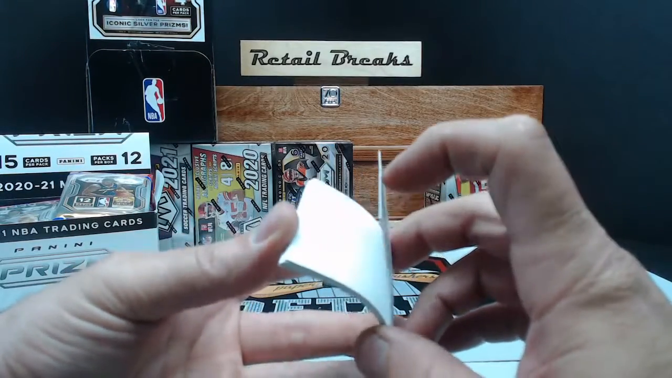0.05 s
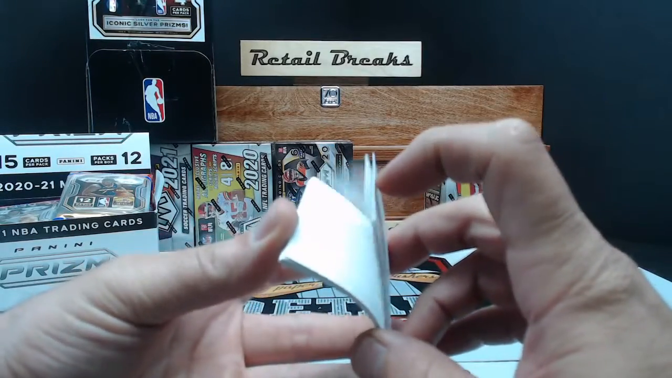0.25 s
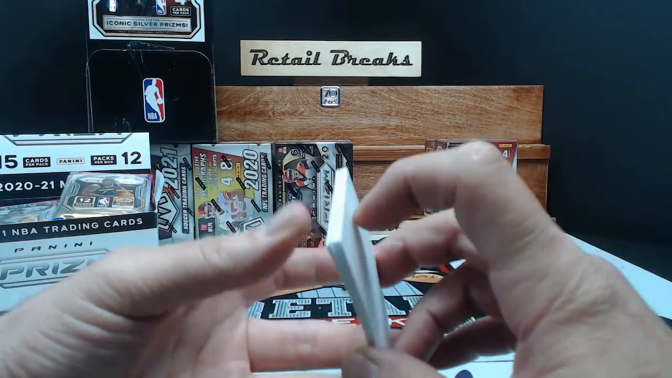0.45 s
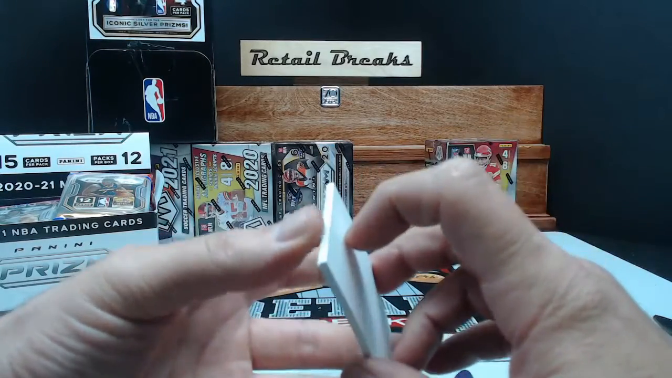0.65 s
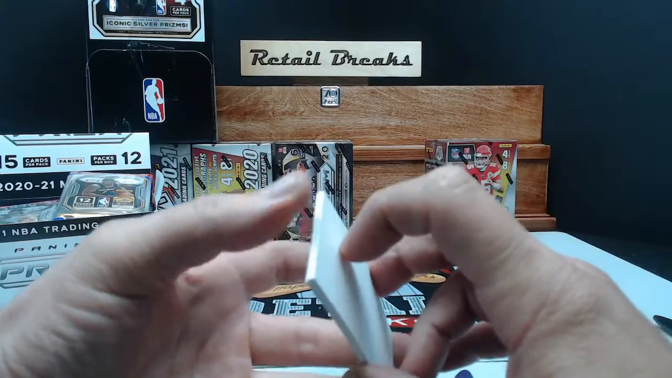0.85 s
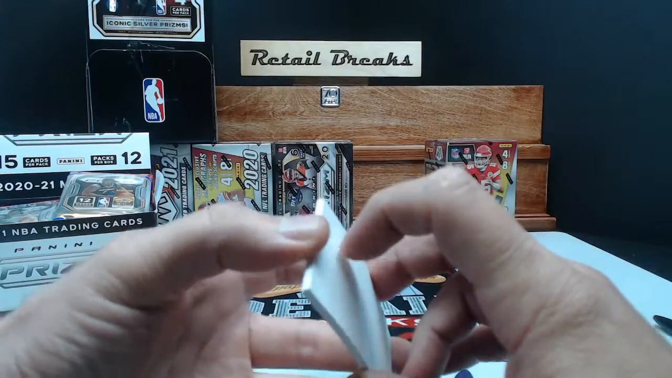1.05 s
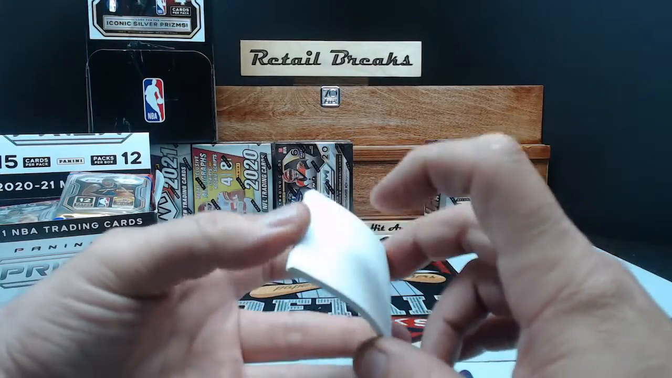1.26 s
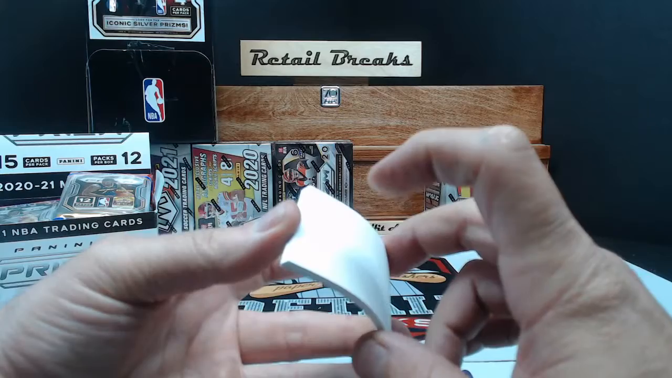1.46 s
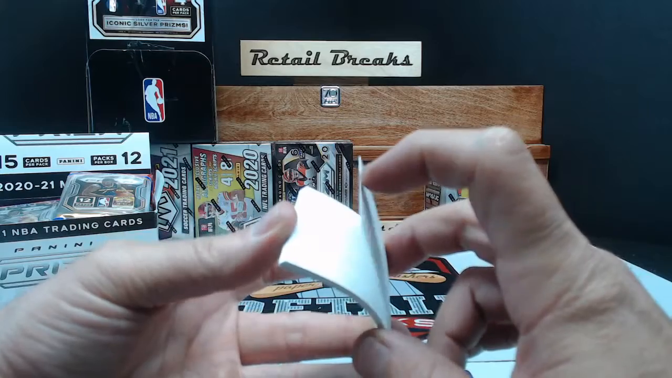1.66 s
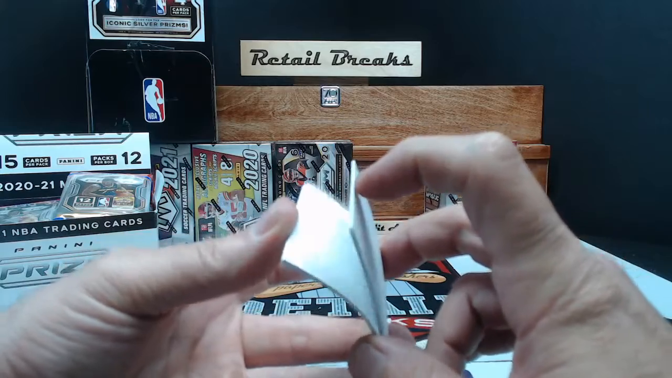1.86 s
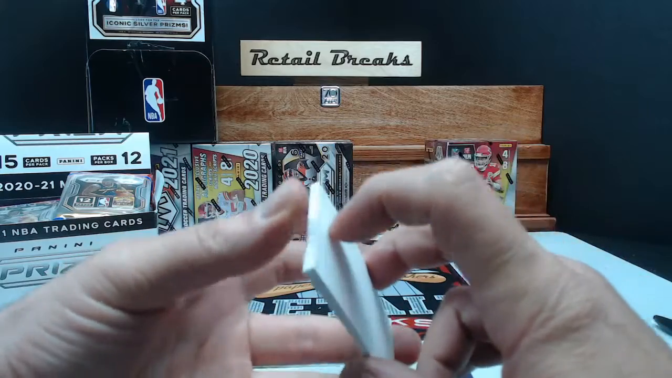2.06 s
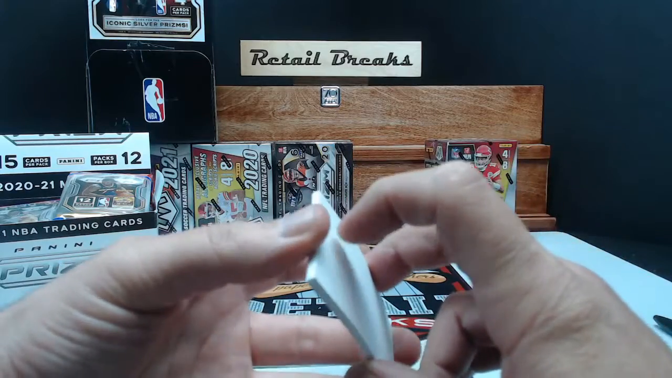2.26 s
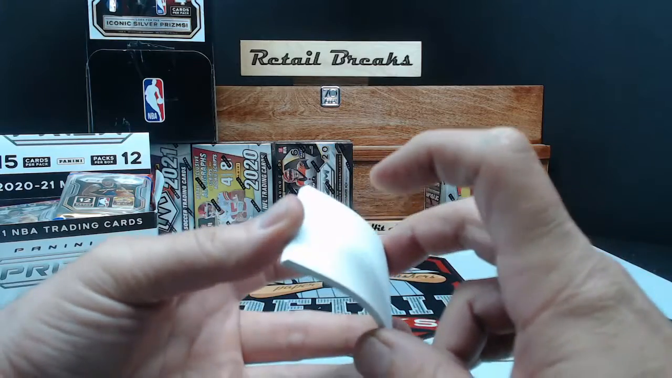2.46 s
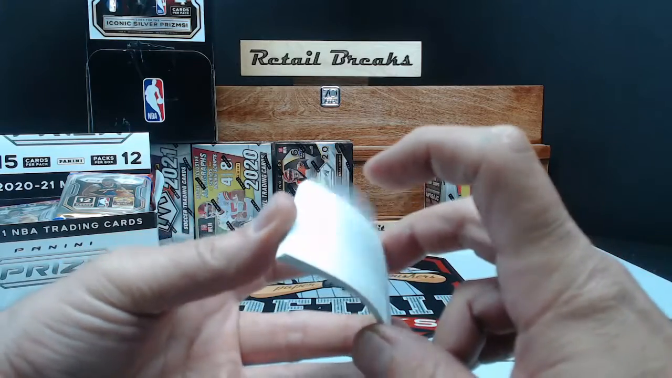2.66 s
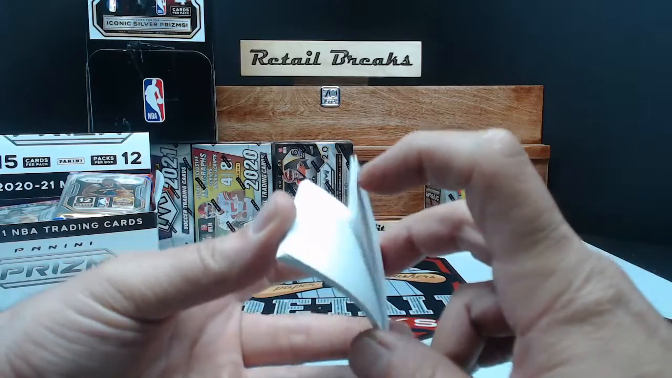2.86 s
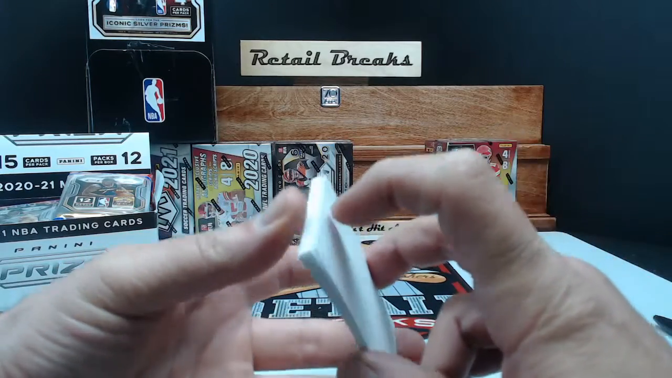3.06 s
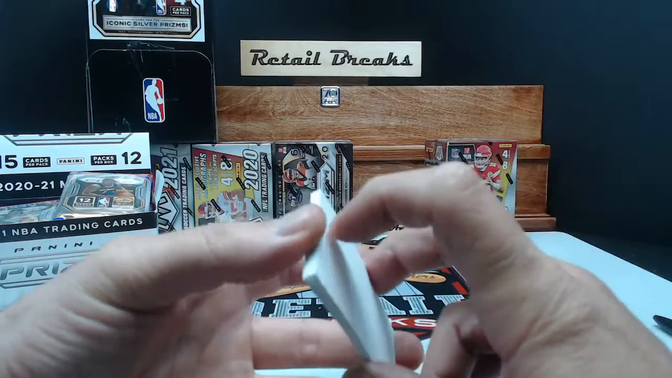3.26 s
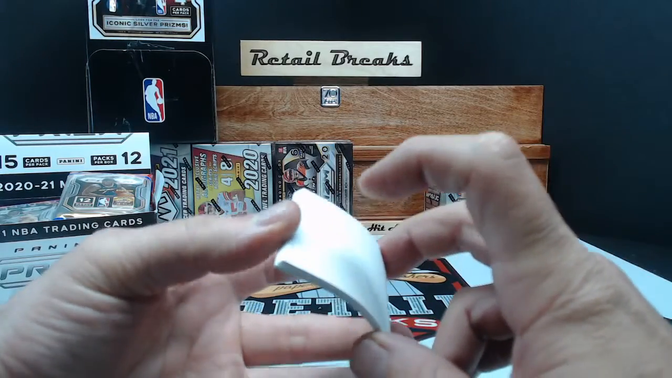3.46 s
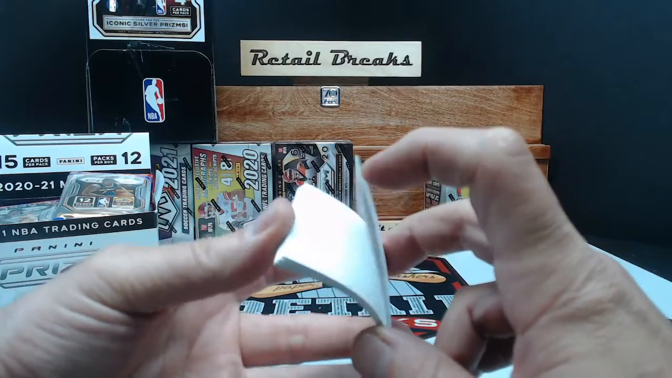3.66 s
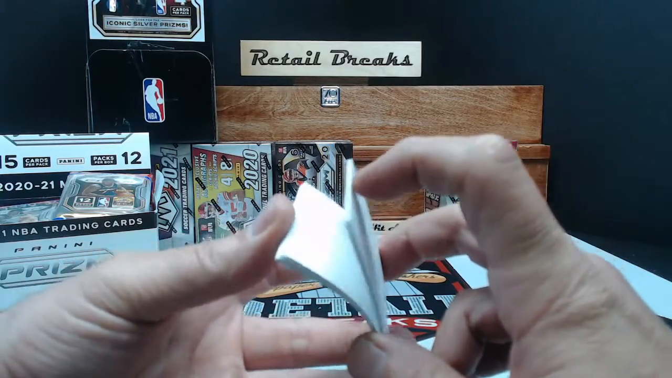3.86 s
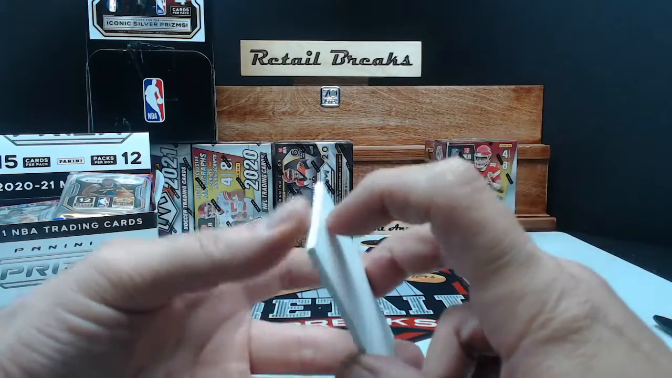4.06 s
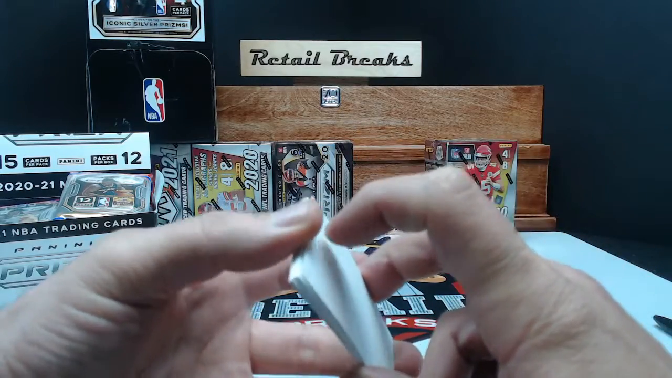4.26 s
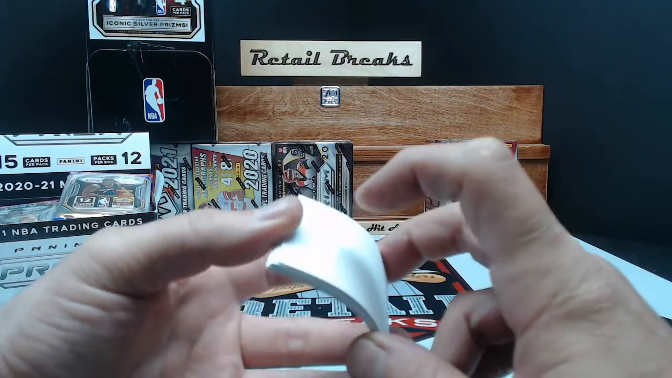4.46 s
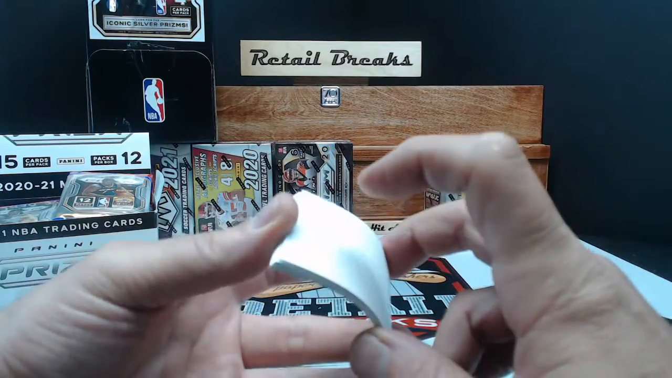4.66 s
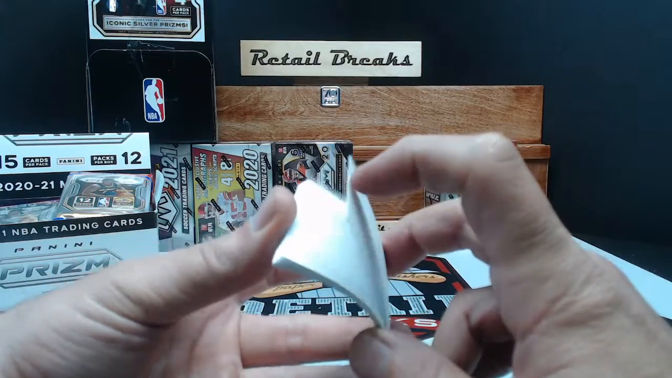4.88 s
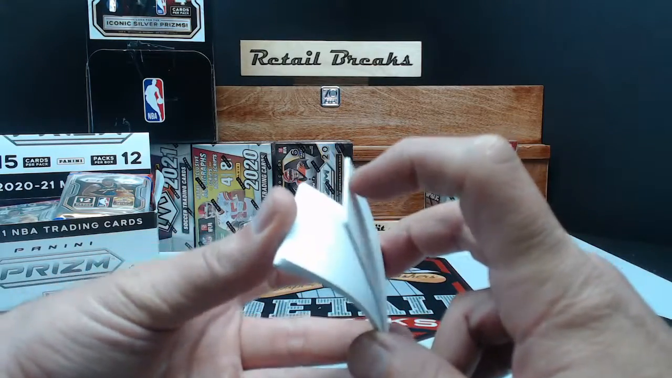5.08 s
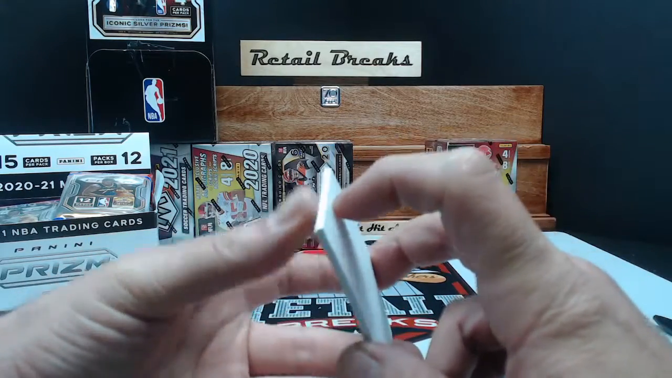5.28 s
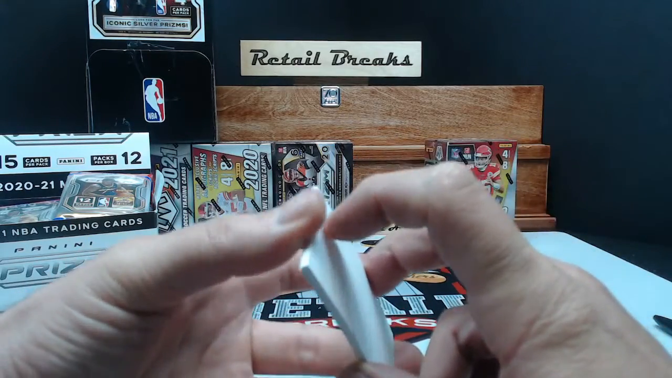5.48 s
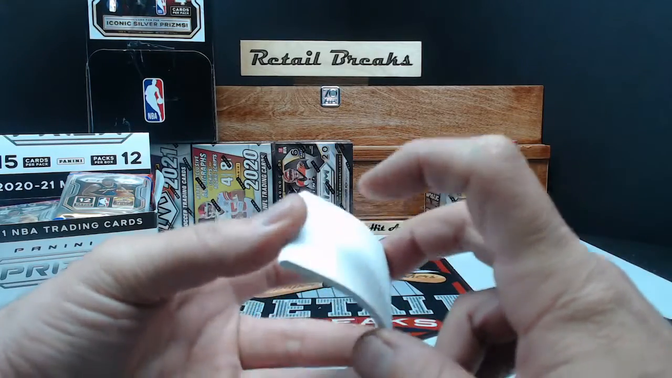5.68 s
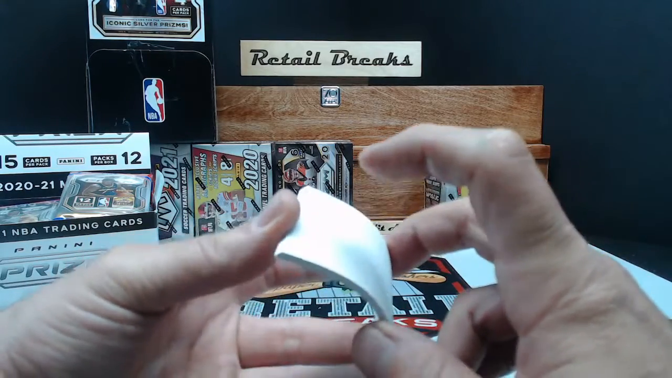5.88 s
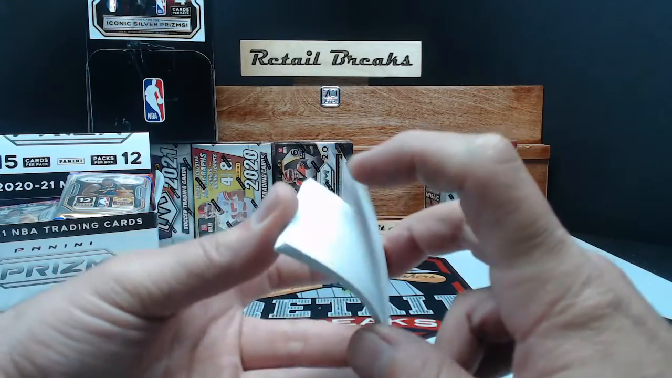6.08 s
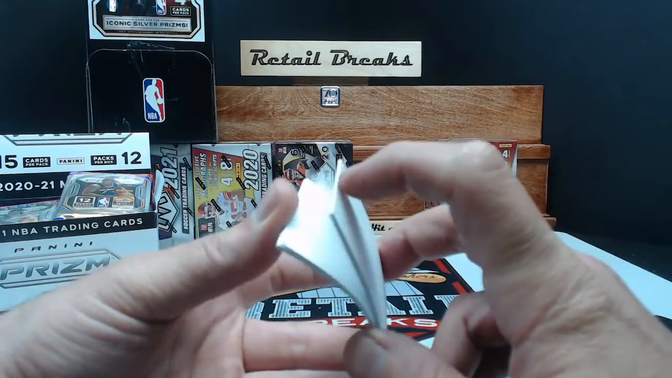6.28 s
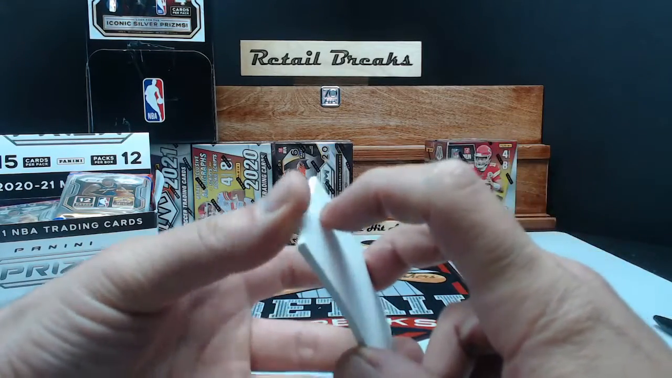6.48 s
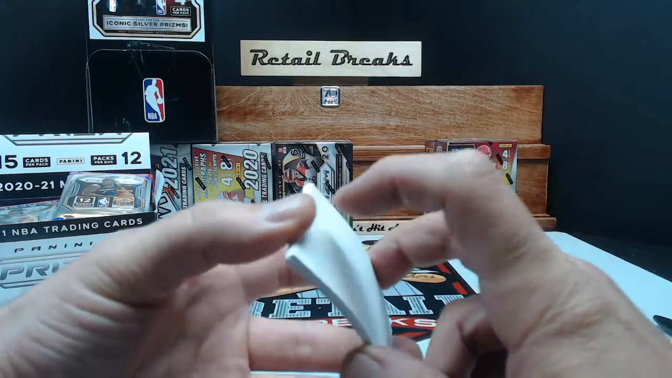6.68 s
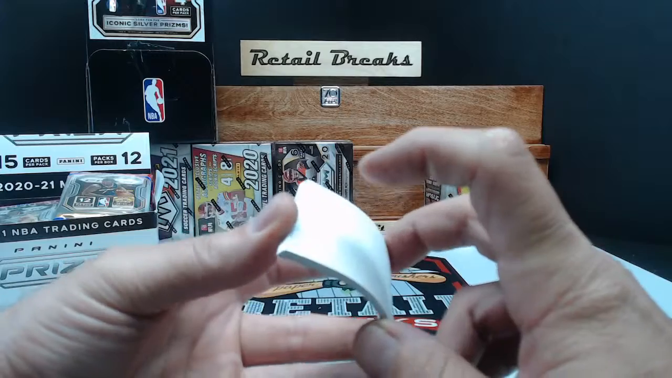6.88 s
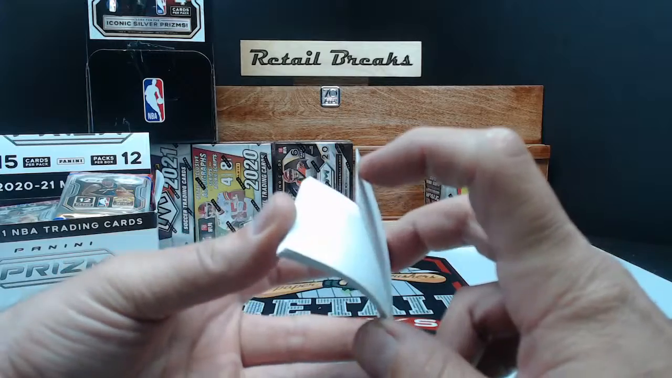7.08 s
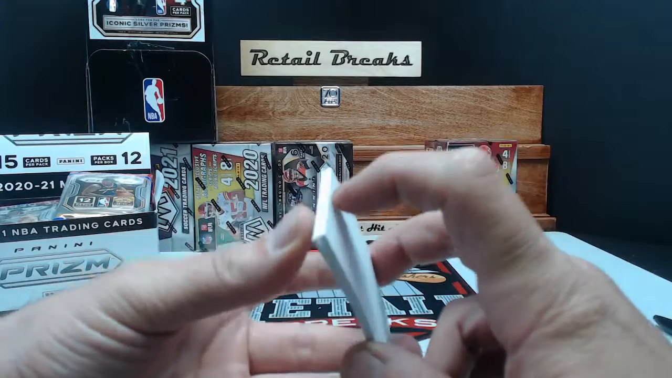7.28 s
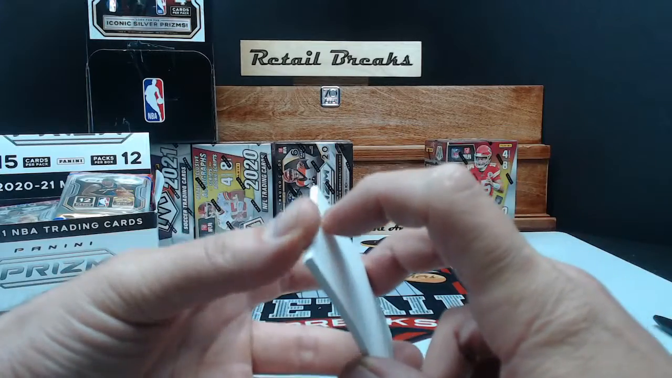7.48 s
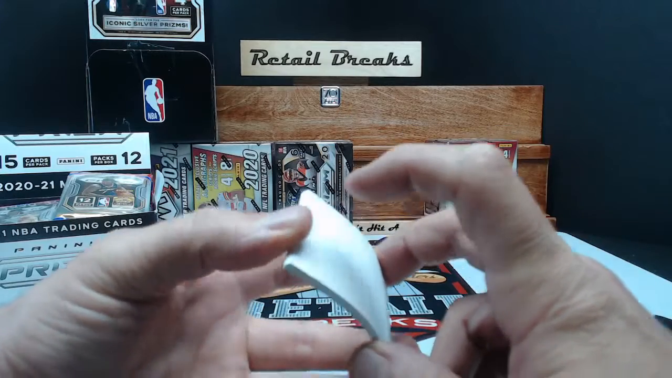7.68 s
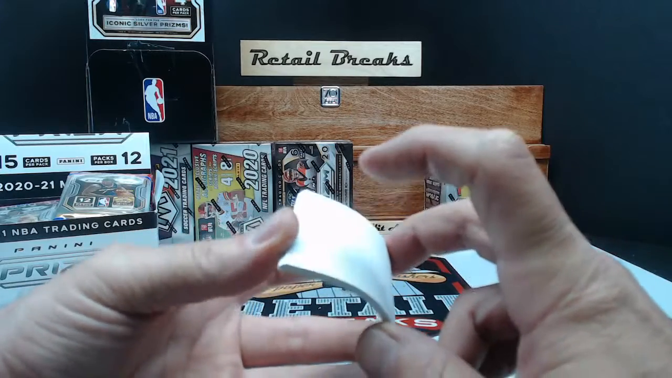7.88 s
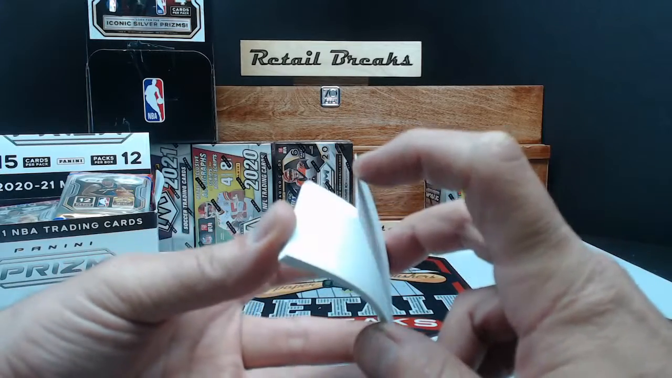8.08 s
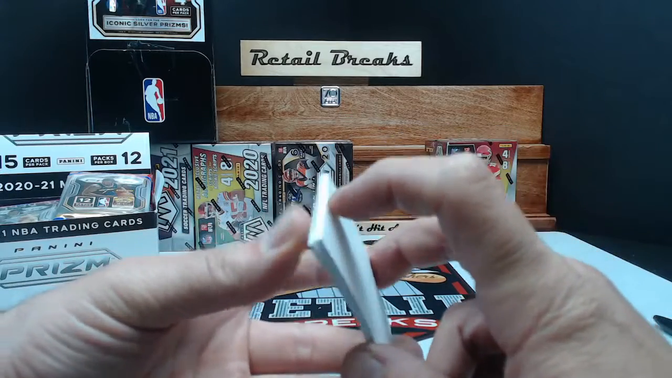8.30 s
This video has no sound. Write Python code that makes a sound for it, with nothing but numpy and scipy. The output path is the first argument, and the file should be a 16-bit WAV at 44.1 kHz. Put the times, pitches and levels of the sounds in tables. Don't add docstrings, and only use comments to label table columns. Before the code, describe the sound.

A small stack of stiff cards is riffled by thumb close to the microphone in a small room. A loud, bright snap starts at 0 s, followed by a light, uneven patter of slaps from 0.15 s and a strong last slap near 0.32 s. Further snaps come at about 1.6, 2.7, 3.6, 4.9, 6.1, 6.95 and 7.95 s. Each is a crisp crack with a short hollow knock from the palm and tiny bounces, then a run of thin, papery ticks lasting until roughly 0.3 s after the snap. The one near 4.9 s is loud and bright, the one at 6.1 s softer, the one at 6.95 s a hard blow. Between riffles there are dull palm taps, faint rubbing and irregular deep desk rumble around 43 Hz. The room floor is very quiet, dull and patchy, briefly opening around each riffle; the last flutter ends near 8.3 s.

```python
import sys
import numpy as np
from scipy import signal
from scipy.fft import rfft, irfft, next_fast_len
from scipy.io import wavfile
from scipy.ndimage import uniform_filter1d

SR = 44100
rng = np.random.default_rng(int(sys.argv[2]) if len(sys.argv) > 2 else 0)


def voltage_ratio(level):
    return 10 ** (np.asarray(level, float) / 20)


def generate_wav(sig):
    pcm = np.round(np.clip(np.atleast_2d(sig).T, -1, 1) * 32767).astype(np.int16)
    wavfile.write(sys.argv[1], SR, pcm)


N = 367794
TIME = np.arange(N) / SR
SLOW_STEP = 40

# (frequency [Hz], density [dB per Hz])
LOW_ROOM = [(41, -36), (70, -4.5), (103, -13), (145, -7.5), (297, -19.5), (420, -15), (560, -34.5),
            (730, -51.5), (1230, -120)]
# (frequency [Hz], density [dB per Hz])
MID_ROOM = [(330, -42.5), (560, 0), (1020, -3), (1330, -1.5), (1480, -7.5), (2340, -12), (2880, -27.5),
            (3180, -37.5), (4030, -26), (5070, -35.5), (6000, -34), (7800, -77), (13200, -120)]
WHINE_HZ, WHINE_DB, HISS_DB = 2830, -15.5, -95.5
OPEN_RISE_DB_PER_S, CLOSE_DB_PER_S, OPEN_S, START_DB = 150.0, 43, 0.067, 8.0
LOW_SHUT_DB, LOW_OPEN_DB, LOW_UNDER_SHAKE_DB = -72, -63.5, -29
MID_SHUT_DB, MID_OPEN_DB = -74.5, -61

# (start [s], length [s], shake [dB])
LEANS = [(0.035, 0.39, -40), (.5, 0.11, -54), (0.74, 0.089, -44.5), (0.999, 0.035, -44.5),
         (1.266, 0.081, -51), (1.668, 0.12, -41), (2.02, 0.24, -41.5), (2.36, 0.21, -41), (2.67, 0.14, -40),
         (3.086, 0.12, -46), (3.37, 0.2, -42.5), (3.73, 0.14, -46), (4.022, 0.36, -49),
         (4.383, 0.059, -46.5), (4.573, 0.052, -50.5), (4.892, 0.23, -45.5), (5.172, 0.15, -38),
         (5.45, .25, -43), (6.056, 0.042, -37), (6.16, 0.09, -54), (6.339, 0.051, -41.5),
         (6.549, 0.14, -43.5), (7.014, 0.058, -44), (7.275, 0.28, -40.5), (7.911, .28, -42)]
# (start [s], length [s], level [dB])
SWAYS = [(.72, 0.17, -43.5), (1.617, .08, -51), (1.988, 0.26, -41.5), (2.363, 0.11, -43.5),
         (2.646, 0.085, -49), (3.38, 0.14, -49.5), (4.019, 0.31, -49), (4.577, 0.063, -54),
         (4.882, .1, -48), (5.352, 0.33, -45.5), (5.97, .1, -58.5), (6.553, 0.092, -50.5),
         (7.903, 0.044, -52.5)]
LEAN_RISE_DB_PER_S, LEAN_FALL_DB_PER_S = 260.0, 302.5
STILL_DB, SWAY_UNDER_SHAKE_DB = -73.5, -8.5

# (time [s], level [dB], pitch [Hz], length [s])
RUSTLES = [(2.35, -84, 5100, 0.012), (2.55, -78.5, 4740, .025), (4.1, -76.5, 1580, 0.025),
           (4.13, -63, 634, 0.022), (0.75, -68, 1287, 0.14), (3.33, -70, 1510, 0.075),
           (5.95, -58.5, 380, 0.044), (7.72, -61, 392, 0.063), (4.78, -73, 695, 0.0176),
           (3.9, -54.5, 139, 0.034), (4.3, -60.5, 333, 0.069), (3.3, -59.5, 450, 0.046),
           (2.19, -67.5, 748, .08), (6.85, -66, 713, .05), (1.05, -60, 120, 0.057)]
RUB_DB, RUB_FADE_DB_PER_S, SLIP_DB = -79.5, 129, -36
TICKS_PER_S, TICK_DB, TICK_S = 90.0, 13, 0.0017
# (time [s], peak [dB], pitch [Hz])
KNOCKS = [(1.296, -57, 401), (1.511, -54, 452), (2.003, -52, 423), (2.047, -68, 305), (2.203, -53, 429),
          (2.457, -50, 428), (2.511, -53, 423), (3.273, -49.5, 970), (4.211, -50.5, 940), (5.544, -67, 367),
          (7.541, -50.5, 300)]
# (frequency [Hz], level [dB], t60 [s])
HOLLOW = [(189, -8.5, 0.19), (482, -13, 0.054), (601, -8.5, 0.047), (912, -7.5, 0.11), (1000, -3.5, 0.077),
          (1160.4, -2.5, 0.3), (2185, -12.5, .03), (2440, -13.5, 0.14), (3400, -9.5, 0.018)]

# (frequency [Hz], density [dB per Hz])
CRACK = [(880, -33.5), (1500, -13.5), (2900, -1.5), (3980, 2), (4880, -2), (6390, -1), (7100, -0.5),
         (9370, -1.5), (10000, 0.5), (10500, -24.5), (13600, -55), (22000, -120)]
# (frequency [Hz], density [dB per Hz])
EDGE = [(9500, -35), (10500, 2), (11600, -6), (12500, -18), (13200, -12.5), (14500, -3), (15600, -6),
        (16300, -22.5)]
CARD_HZ = [2327, 4290, 5520, 6400, 8290, 9370]
# (time [s], crack rms [dB], blow on the hollow [dB], pitch of the air gap [Hz], share above 10 kHz [dB])
SNAPS = [
    (0.0002, -22, -21.5, 3910, -6),
    (1.5828, -24, -21.5, 2500, -19.5),
    (2.662, -24.5, -22, 4280, -18.5),
    (3.6126, -25.5, -24, 4290, -19),
    (4.859, -22.5, -22, 3400, -6.5),
    (6.0714, -27.5, -23, 2250, -15.5),
    (6.9499, -23.5, -20, 2560, -8),
    (7.9483, -26, -23.5, 2263, -19),
]
SNAP_MS = 2.2
TOUCH_LEAD_S, TOUCH_DB, TOUCH_HZ = 0.0085, -46.5, 4300
# (time [s], crack rms [dB], blow on the hollow [dB])
BOUNCES = [(0.0249, -32, -30), (0.052, -69, -56), (1.6049, -45, -30), (1.621, -46, -31.5), (1.63, -63, -40),
           (2.687, -42, -30), (2.708, -50, -38), (3.6224, -56, -33.5), (3.637, -40.5, -31.5),
           (4.8758, -46, -34.5), (4.8806, -47, -31.5), (4.8851, -37.5, -41), (4.8984, -41, -36),
           (5.1519, -50, -31), (6.0902, -54, -30), (6.1147, -42, -36.5), (6.1305, -37, -33.5),
           (6.9647, -34, -39), (6.9901, -55, -39), (7.029, -67, -39), (7.971, -56, -31.5),
           (7.9864, -46, -35), (7.996, -60, -41)]
BOUNCE_HZ, BOUNCE_MS, BOUNCE_TOP_DB = 2450, 2.3, -17.5
# (time [s], edge rms [dB], gap pitch [Hz], face lag [ms], blow [dB])
PAIRS = [(1.7029, -40.5, 3650, 9.5, -32), (1.7615, -40.5, 4180, 9.9, -34), (2.801, -42, 4100, 10.6, -41.5),
         (3.7672, -35, 6400, 7.1, -35.5), (3.8247, -40, 6100, 8.1, -40), (5.036, -37, 3950, 7.9, -35.5),
         (6.2111, -38, 5600, 6.3, -36.5), (7.1362, -37, 4450, 8.9, -33.5), (7.161, -42, 6400, 9.5, -38.5),
         (8.1497, -40.5, 4130, 11.8, -36.5)]
EDGE_MS, FACE_MS, FACE_HZ, FACE_UNDER_BLOW_DB = 2.6, 4.8, 4200, -12.5
# (time [s], rms [dB], gap pitch [Hz])
CARDS = [(0.1504, -38.5, 4350), (0.1625, -42, 4300), (0.1886, -48, 2440), (0.2161, -36.5, 5400),
         (0.253, -50.5, 3800), (0.2731, -39.5, 3600), (0.3004, -36, 3700), (1.727, -42.5, 2330),
         (1.8552, -42, 5360), (1.885, -42, 3630), (2.835, -56, 4200), (2.879, -42.5, 4400),
         (2.914, -47, 4300), (2.944, -42, 4120), (3.869, -37.5, 3760), (3.8863, -43, 4020),
         (3.8986, -50, 4340), (5.0707, -37.5, 7930), (5.102, -36.5, 6400), (6.2419, -56, 3980),
         (6.252, -39, 3740), (6.2766, -41.5, 3940), (7.1905, -41, 8400), (7.2036, -42.5, 3530),
         (7.2135, -38.5, 3600), (8.202, -43, 3840), (8.232, -51, 4000), (8.2495, -41, 4000)]
# (start [s], last card [s], its rms [dB], its gap pitch [Hz], share above 10 kHz [dB])
RIFFLES = [
    (0.158, 0.318, -24, 4380, -15),
    (1.73, 1.9323, -35.5, 4240, -15),
    (2.797, 2.9882, -42, 2580, -21),
    (3.779, 3.952, -40, 7130, -11),
    (5.023, 5.146, -29, 6400, -9),
    (6.202, 6.318, -36.5, 4120, -26),
    (7.145, 7.2595, -35.5, 6390, -21),
    (8.167, 8.2752, -38.5, 4100, -39),
]
CARD_MS, LAST_MS = 3.5, 7.5

# (frequency [Hz], t60 [s])
TAIL = [(300, 0.45), (1300, 0.15), (4000, 0.17), (10000, 0.16), (16000, .12)]
# (centre [Hz], width [Hz], gain [dB])
HELD = [(4740, 160, -15), (7270, 130, -18), (10900, 430, -5), (12400, 440, -8.5), (13370, 300, -6),
        (16300, 500, -18.5)]
STRIPE_DB, STRIPE_FROM_HZ, STRIPE_FULL_HZ = 3, 1300, 11000
GATE_FROM_HZ, GATE_SHARE, GATE_DB, GATE_FRAMES, GATE_OPENS_DB = 10300, 0.1, -20, 7, -62


def rms_one(x):
    return x / np.sqrt(np.mean(x ** 2) + 1e-20)


def at_hz(points, hz):
    table_hz, values = np.array(points)[:, 0], np.array(points)[:, 1]
    return np.interp(np.log(hz + 1), np.log(table_hz), values)


def drift(rate):
    r = np.exp(-2 * np.pi * rate * SLOW_STEP / SR)
    chance = rng.standard_normal(N // SLOW_STEP + 2002)
    return rms_one(signal.lfilter([1], [1, -2 * r, r * r], chance)[2000:])


def swell(slow_db):
    return np.interp(np.arange(N) / SLOW_STEP, np.arange(len(slow_db)), voltage_ratio(slow_db))


def plateau(start, end, level_db, rise, fall):
    return voltage_ratio(level_db - rise * np.maximum(start - TIME, 0) - fall * np.maximum(TIME - end, 0))


def ring(x, hz, t60):
    r = voltage_ratio(-60 / (t60 * SR))
    w = 2 * np.pi * hz / SR
    return signal.lfilter([0, np.sin(w)], [1, -2 * r * np.cos(w), r * r], x + 1e-18)


def bands(low_hz, high_hz, count):
    edges = np.geomspace(low_hz, high_hz, count + 1)
    return [(np.sqrt(a * b), signal.butter(2, [a, b], "band", fs=SR, output="sos"))
            for a, b in zip(edges, edges[1:])]


def coloured(spectrum):
    size = next_fast_len(N)
    white = rfft(rng.standard_normal(size))
    hz = np.arange(len(white)) * SR / size
    return rms_one(irfft(white * voltage_ratio(at_hz(spectrum, hz)), size)[:N])


def patchy(spectrum, low_hz, high_hz, count, patch_db, rate):
    noise, together = coloured(spectrum), drift(5.6)
    out = 0
    for _, sos in bands(low_hz, high_hz, count):
        gain = swell(patch_db * (drift(rate) + 0.5 * together))
        out = out + gain * signal.sosfilt(sos, noise)
    return rms_one(out)


def room(low_db, mid_db, shake_db):
    whine = voltage_ratio(WHINE_DB) * rms_one(ring(rng.standard_normal(N), WHINE_HZ, 0.09))
    rumble = coloured([(45, -44), (60, 2.5), (90, -4.5), (140, -8.5), (260, -17.5), (400, -71.5)])
    bass = voltage_ratio(shake_db - 16.5) * rumble
    low = voltage_ratio(low_db + 7.5) * patchy(LOW_ROOM, 65, 600, count=10, patch_db=3.5, rate=15.0)
    mid = patchy(MID_ROOM, 520, 6505, count=24, patch_db=4.0, rate=4.1) + whine
    return bass + low + voltage_ratio(mid_db + 1.0) * mid + voltage_ratio(HISS_DB) * rng.standard_normal(N)


def leaning(events):
    return sum(plateau(s, s + long, db, LEAN_RISE_DB_PER_S, LEAN_FALL_DB_PER_S) for s, long, db in events)


def wobbling(hz, t60):
    x = rms_one(ring(ring(rng.standard_normal(N), hz, t60), hz, t60))
    power = uniform_filter1d(uniform_filter1d(x ** 2, size=3000), size=3000)
    return x / np.sqrt(power + 0.078)


def desk(shake):
    wobble, sway = wobbling(44, 0.22), wobbling(23, 0.5)
    return shake * wobble + (leaning(SWAYS) + voltage_ratio(SWAY_UNDER_SHAKE_DB) * shake) * sway


def rustles():
    white = rng.standard_normal(N)
    out = 0
    for s, db, hz, long in RUSTLES:
        narrow = rms_one(ring(ring(white, hz, 20 / hz), hz, 20 / hz))
        out = out + voltage_ratio(db) * np.exp(-((TIME - s) / long) ** 2) * narrow
    return out


def rubbing():
    catches = (rng.random(N) < TICKS_PER_S / SR) * voltage_ratio(TICK_DB + 2.8 * rng.standard_normal(N))
    catches = signal.lfilter([1], [1, -np.exp(-1 / (TICK_S * SR))], catches + 1e-18)
    level = np.zeros(N)
    for start, last, *_ in RIFFLES:
        level += plateau(start, last, RUB_DB, 1800.0, RUB_FADE_DB_PER_S) * (1 + catches * (TIME < last))
    for s, db, *_ in SNAPS[1:]:
        level[:round(s * SR)][-4096:] += voltage_ratio(db + SLIP_DB - 2500 * TIME[4095::-1])
    return level * swell(2.0 * drift(150.0)) * (coloured(CRACK) + voltage_ratio(-26.5) * coloured(EDGE))


def knocks():
    out, t = np.zeros(N), TIME[:4096]
    shape = (1 - np.exp(-t / 0.001)) * np.exp(-t / 0.014)
    for s, peak_db, hz in KNOCKS:
        out[round(s * SR):][:4096] += voltage_ratio(peak_db) * np.sin(2 * np.pi * hz * t) * shape
    return out


def blows():
    snapped = [(row[0], row[2]) for row in SNAPS + BOUNCES]
    return snapped + [(s + lag / 1000, db) for s, _, _, lag, db in PAIRS]


def hollow(hits):
    hz, level_db, t60 = np.transpose(HOLLOW)[..., None]
    out, t = np.zeros(N + 4096), TIME[:4096]
    chance = rng.standard_normal((len(hits), 2, len(HOLLOW), 1))
    for (s, blow_db), (strength, detune) in zip(hits, chance):
        decay = voltage_ratio(level_db + strength - 60 * t / t60)
        modes = decay * np.sin(2 * np.pi * hz * (1 + 0.037 * detune) * t)
        open_s = 0.0035 + 0.00026 * max(blow_db + 39.0, 0)
        choke = 0.23 + 0.87 / (1 + np.exp((t - open_s) / 0.00051))
        attack = 1 - np.exp(-t / 0.001)
        out[round(s * SR):][:4096] += voltage_ratio(blow_db - 2.5) * attack * choke * modes.sum(axis=0)
    return out[:N]


def landings():
    starts, tops = np.transpose(RIFFLES)[[0, 4]]

    def top(s):
        return tops[np.argmin(np.abs(starts - s))]

    rows = [(s, db, hz, top_db, SNAP_MS) for s, db, _, hz, top_db in SNAPS]
    rows += [(s - TOUCH_LEAD_S, TOUCH_DB, TOUCH_HZ, BOUNCE_TOP_DB, SNAP_MS) for s, *_ in SNAPS[1:]]
    rows += [(s, db, BOUNCE_HZ, BOUNCE_TOP_DB, BOUNCE_MS) for s, db, _ in BOUNCES]
    rows += [(s, db, hz, top(s), EDGE_MS) for s, db, hz, *_ in PAIRS]
    rows += [(s + lag / 1000, db + FACE_UNDER_BLOW_DB, FACE_HZ, top(s), FACE_MS) for s, _, _, lag, db in PAIRS]
    rows += [(s, db, hz, top_db, LAST_MS) for _, s, db, hz, top_db in RIFFLES]
    return rows + [(s, db, hz, top(s), CARD_MS) for s, db, hz in CARDS]


def cracks(slaps):
    lead = 512
    out, body, t = np.zeros(N + 4096), coloured(CRACK), TIME[:2560] - lead / SR
    after = np.maximum(t, 0)
    edge = patchy(EDGE, 8700, 19000, count=7, patch_db=4.0, rate=12.0)
    chance = rng.standard_normal((len(slaps), len(CARD_HZ)))
    for (s, level_db, gap_hz, top_db, ms), luck in zip(slaps, chance):
        i = round(s * SR)
        fall = (np.clip(ms, 2, 7) - 1) * 0.00037
        soft = np.clip((-level_db - 24.5) * 0.068, 0.12, 1)
        swelling = 0.1 * soft * np.exp(t / 0.002)
        burst = 1 - (1 - 0.1 * soft) * np.exp(-t / (0.6 * fall * soft))
        shape = np.where(t < 0, swelling, burst) * (np.exp(-after / fall) + 0.083 * np.exp(-after / 0.0076))
        puff = np.resize(body[i:], len(t)) * shape
        card = sum(voltage_ratio(4.5 * k) * ring(puff, hz * (1 + 0.02 * k), 0.008) for hz, k in zip(CARD_HZ, luck))
        puff = puff + (0.12 + 0.1 * soft) * ring(puff, gap_hz, 0.012) + 0.07 * card
        high_pass = signal.butter(6, 0.8 * min(gap_hz, 4000), "high", fs=SR, output="sos")
        thin = signal.sosfilt(high_pass, puff)
        puff = (1 - soft ** 2.2) * puff + soft ** 1.5 * thin
        puff = puff / np.sqrt(uniform_filter1d(puff ** 2, size=66).max())
        top = np.resize(edge[i:], len(t)) * shape
        top = top / np.sqrt(uniform_filter1d(top ** 2, size=132).max())
        out[i:i + len(t)] += voltage_ratio(level_db - 3.0) * (puff + voltage_ratio(top_db - 2.0) * top)
    return out[lead:N + lead]


def reverberation(x):
    out, white = 0, rng.standard_normal((2, N))
    fill = np.exp(-1 / (0.0005 * SR))
    for k, (hz, sos) in enumerate(bands(291, 17000, count=20)):
        energy = signal.lfilter([1 - fill], [1, -fill], signal.sosfilt(sos, x) ** 2)
        quick, slow = voltage_ratio(-120 / (at_hz(TAIL, hz) * np.array([0.7, 1.6]) * SR))
        early = signal.lfilter([1 - quick], [1, -quick], energy)
        late = signal.lfilter([1 - slow], [1, -slow], early * 0 + energy)
        energy = early + 0.32 * late
        out = out + np.sqrt(np.abs(energy)) * rms_one(signal.sosfilt(sos, white[k % 2]))
    return out


def suppressor(x):
    hz, s, frames = signal.stft(x, SR, nperseg=512)
    starts = np.sort([row[0] - 0.02 for row in RIFFLES + SNAPS])
    stage = np.maximum(np.searchsorted(starts, s) - 1, 0)
    luck = uniform_filter1d(rng.standard_normal((len(hz), len(starts))), size=2, axis=0)[:, stage]
    fresh = rng.standard_normal((len(hz), len(s)))[:, np.arange(len(s)) // GATE_FRAMES]
    loud = np.abs(frames[hz > 3000]).mean(axis=0) / voltage_ratio(GATE_OPENS_DB)
    opening = uniform_filter1d(luck + 0.7 * fresh, size=3, axis=0) + uniform_filter1d(loud, size=5)
    gate_db = GATE_DB * (hz[:, None] > GATE_FROM_HZ) * (opening < GATE_SHARE)
    held_db = sum(db * np.exp(-((hz - centre_hz) / width) ** 2) for centre_hz, width, db in HELD)
    stripe_db = STRIPE_DB * np.clip((hz - STRIPE_FROM_HZ) / STRIPE_FULL_HZ, 0, 1)
    cut_db = (held_db[:, None] + stripe_db[:, None] * luck + gate_db) * (stage % 2)
    return signal.istft(frames * voltage_ratio(cut_db), SR, nperseg=512)[1][:N]


def scene():
    shake = voltage_ratio(STILL_DB) + leaning(LEANS)
    opened = sum(plateau(s, s + OPEN_S, 0, OPEN_RISE_DB_PER_S, CLOSE_DB_PER_S) for s, *_ in RIFFLES)
    opened = opened + plateau(0, 0, START_DB, 0, 130.0)
    low = voltage_ratio(LOW_SHUT_DB) + voltage_ratio(LOW_OPEN_DB) * opened + voltage_ratio(LOW_UNDER_SHAKE_DB) * shake
    mid = voltage_ratio(MID_SHUT_DB) + voltage_ratio(MID_OPEN_DB) * opened
    shake_db, low_db, mid_db = 20 * np.log10([shake, low, mid])
    background = room(low_db, mid_db, shake_db) + desk(shake)
    cards = rustles() + rubbing() + knocks() + hollow(blows()) + cracks(landings())
    return (background + suppressor(cards + voltage_ratio(-8.5) * reverberation(cards)))[None]


def band_limit(x):
    return signal.sosfilt(signal.butter(12, 16860, fs=SR, output="sos"), x)


def record(dry):
    top_cut = signal.cheby2(10, 50, 16950, fs=SR, output="sos")
    mix = signal.sosfilt(top_cut, dry)
    return band_limit(mix)


dry = scene()
out = record(dry)
generate_wav(out)
```